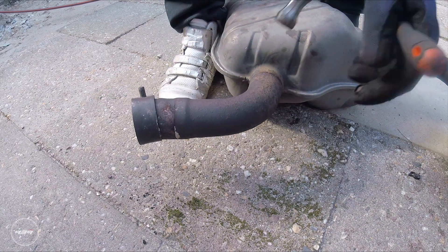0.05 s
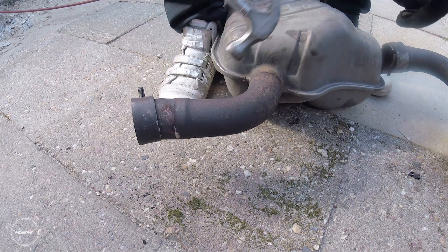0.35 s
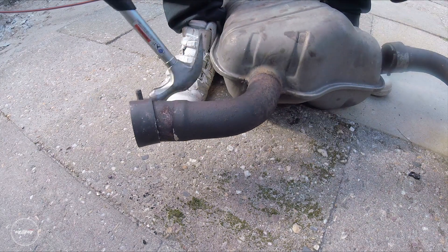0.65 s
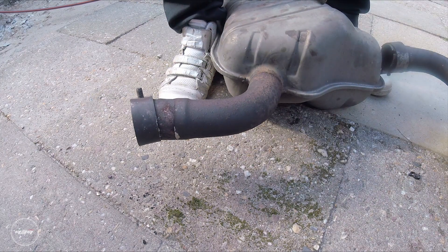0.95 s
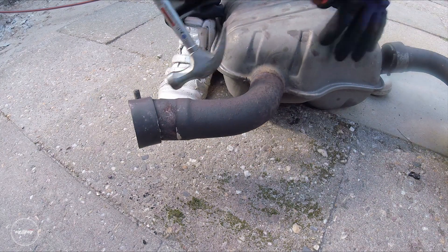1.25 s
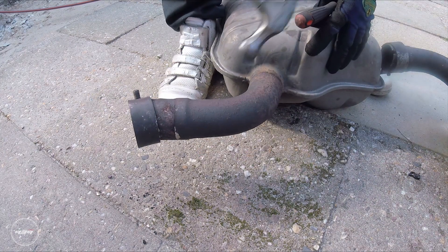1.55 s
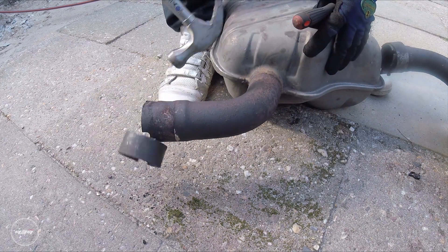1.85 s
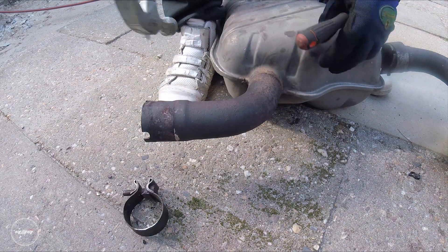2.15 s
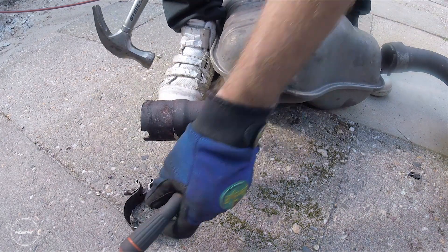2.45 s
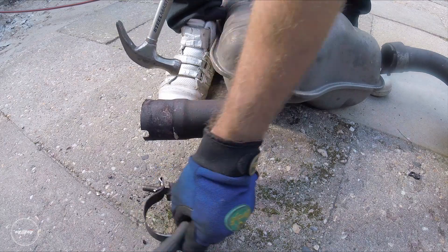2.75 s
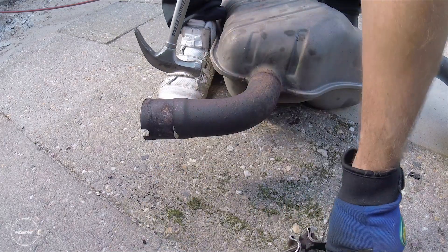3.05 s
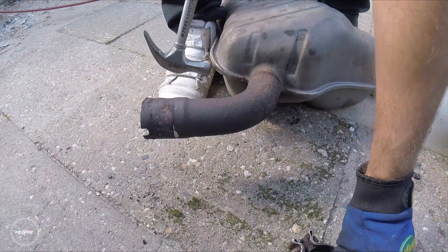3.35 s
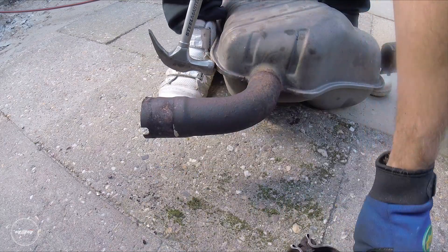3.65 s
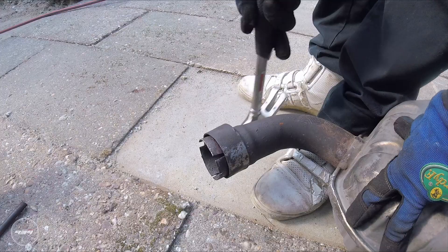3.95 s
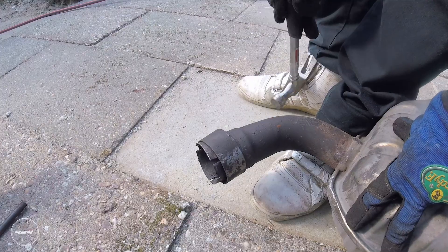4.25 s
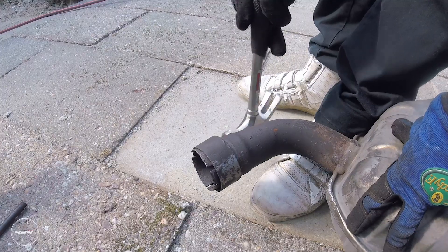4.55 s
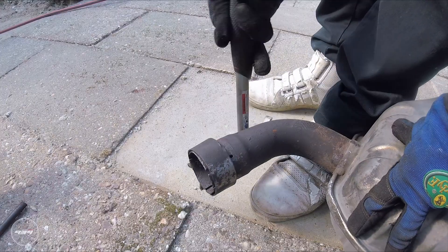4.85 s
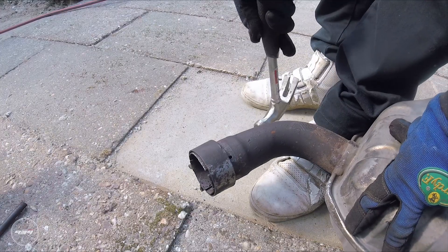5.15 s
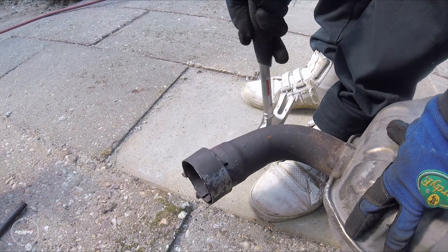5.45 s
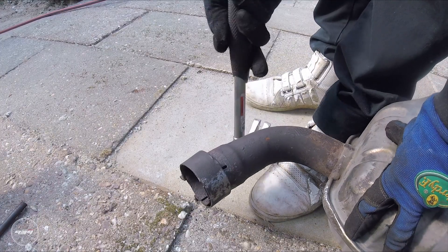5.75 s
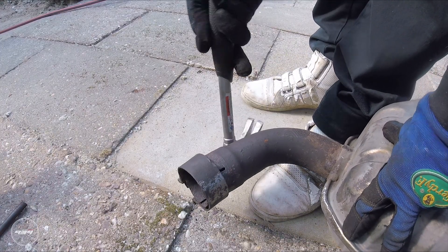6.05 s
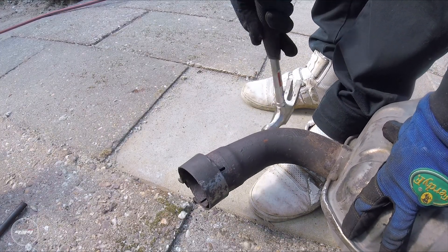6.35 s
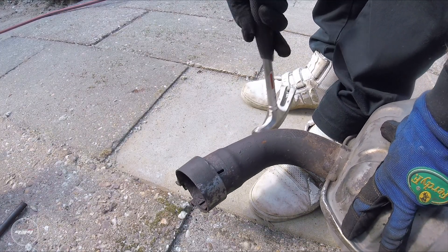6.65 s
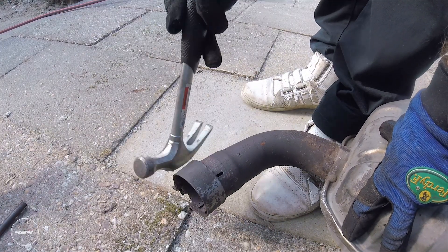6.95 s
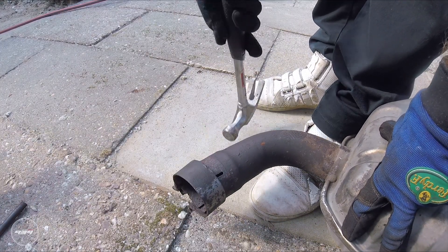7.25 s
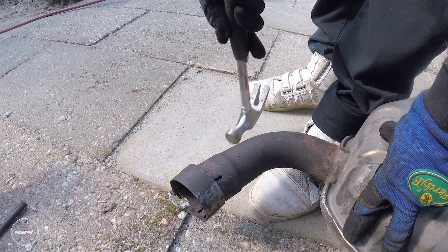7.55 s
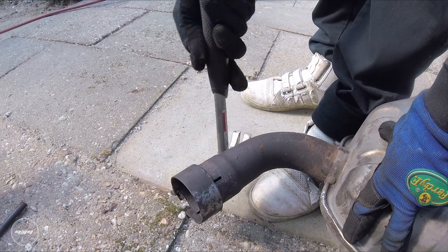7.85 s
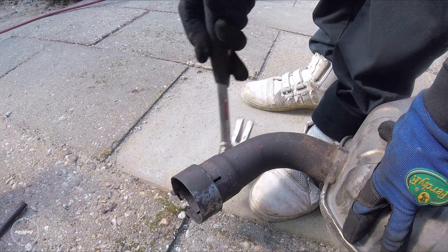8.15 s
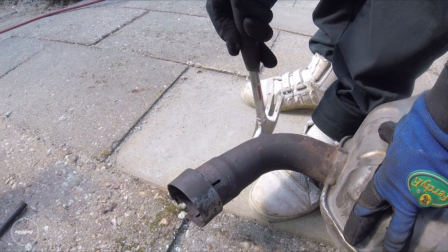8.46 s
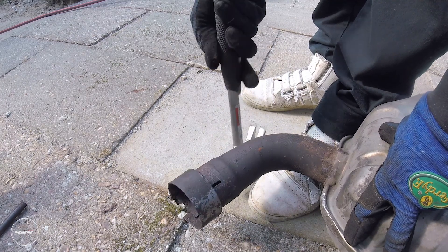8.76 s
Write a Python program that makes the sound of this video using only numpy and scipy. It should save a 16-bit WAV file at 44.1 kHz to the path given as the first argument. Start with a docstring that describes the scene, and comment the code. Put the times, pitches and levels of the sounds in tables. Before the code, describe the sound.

Outdoors on paving, heard close up over quiet air, a hammer strikes a rusty exhaust silencer four times, at about 0.1, 0.6, 1.1 and 1.6 seconds. Each blow is a thin metal clang with a hollow knock, a slight rattle and a lingering pipe tone. At 1.8 seconds a steel collar grinds briefly off the pipe, lands at 1.9 and jingles to rest by 2.2. Soft, damped clinks come around 2.6 and 3.1 as it is picked up, then a tiny drag and the dull clink of a chisel laid down at 3.6. From 4 to 8.6 seconds twelve more blows fall steadily, about 0.4 seconds apart, mostly brighter, with ringing pipe tones, occasional rebounds and low thumps as the silencer rocks. Faint gritty scrapes and crunches slip between them. A distant engine hums faintly behind this run until the end, near 9 seconds.

```python
"""Outdoors on paving, one microphone close to an exhaust silencer. Four claw hammer blows knock a
rusty collar off its pipe; the collar drops, bounces and is picked up, and a chisel is laid down.
Twelve more blows land on a second pipe end, the silencer held up on a shoe, rocking and scraping
on the grit. Each blow makes the thin shell clang, the hollow body knock and the pipe sing on.
An engine hums far off behind the second run of blows."""
import sys
import numpy as np
from scipy import signal
from scipy.fft import rfft, irfft, next_fast_len
from scipy.io import wavfile
from scipy.ndimage import map_coordinates

SR = 44100
rng = np.random.default_rng(int(sys.argv[2]) if len(sys.argv) > 2 else 0)


def dump(signal):
    """Clip the signal to [-1, 1] and save it as 16-bit WAV at the path in sys.argv[1]."""
    limited = np.clip(np.atleast_2d(signal).T, -1, 1)
    pcm = np.round(limited * 32767).astype(np.int16)
    wavfile.write(sys.argv[1], SR, pcm)


N = 392490
T = np.arange(N) / SR
TOP_HZ = 15600  # upper edge of the clang and of the recorder's band
SLIDE_S, SLIDE_PEAK_S, FALL_S = 1.68, 1.826, 1.895  # the collar starts to slide, grinds hardest, lands
LIFT_S = 3.85  # from here on the silencer is held up on a shoe

# hammer blows: t/s, level/dB, brightness/dB, hollow knock/dB, its favoured note f/Hz,
# spot struck (0 at the silencer, 1 at the rim), after-ring/dB, rocking thump/dB
BLOWS = [(.11, -14.5, -1, 0, 596, .1, -1, -17), (.617, -15, -1.5, -0.5, 536, 0.26, -2, -11.5),
         (1.106, -15, 7, -2.5, 448, 0.45, -5.5, -12), (1.5979, -14.5, -0.5, -4.5, 520, 0.93, 3.5, -28),
         (3.963, -14.5, 4, -5.5, 547, 0.3, 3.5, -8), (4.3914, -13.5, 7.5, -8.5, 570, 0.34, 1.5, -3.5),
         (4.8287, -14.5, 3.5, -6, 670, .36, -5.5, -4), (5.245, -16, 6, -2, 491, 0.39, 4.5, -5.5),
         (5.6452, -14.5, 4, -8.5, 1230, 0.42, 0.5, -3), (6.0411, -13, 6, -8.5, 566, 0.63, 1.5, -5.5),
         (6.4376, -10.5, 4.5, -9.5, 1230, .6, -11.5, -9.5), (6.8656, -16.5, 1, -4.5, 553, 0.95, -2.5, -7),
         (7.3355, -12.5, 1, -5, 680, 1, 1, -4.5), (7.7596, -16, 2.5, 0.5, 510, .1, 2.5, -5),
         (8.1718, -16, 9.5, -3, 496, 0.28, 2, -2.5), (8.579, -15.5, -3, -6.5, 900, 0.69, 1, -1)]
# hammer rebounds and light knocks as the silencer shifts: t/s, level/dB, boom/dB, brightness/dB
KNOCKS = [(.134, -20.5, 6.5, -0.5), (.148, -24, 6, 1.5), (.646, -22.5, 9.5, 5), (1.6271, -20, -4, 7.5),
          (1.813, -35.5, -1, 1), (4.056, -40, 9.5, -13), (5.2995, -28.5, 0.5, -13), (6.085, -23, 3, -19),
          (6.525, -35.5, 3, 5), (6.894, -28.5, -6.5, 9), (7.735, -31.5, -6, 8.5), (8.2151, -26.5, 7, 0),
          (8.641, -39, 7, 4)]
# spectrum of the clang with the silencer lying flat: f/Hz, level/dB
LYING = [(70, -16), (190, -13.5), (255, -7.5), (330, -8.5), (540, -6), (1000, -13), (2200, -18),
         (5000, -19.5), (9000, -27), (15000, -33)]
# modes of the collar: f/Hz, level/dB, t60/s
COLLAR = [(683, 1, 0.22), (1487, 3, 0.11), (1823, 8, 0.24), (2236, 2, 0.26), (3237, 11.5, 0.067),
          (4595, 10, 0.055), (5470, 3.5, 0.32), (5930, 2.5, 0.12), (6772, -1, 0.19), (8070, -4, 0.19)]


def shell_clangs(hits, burst, rise_s, burst_s=.011, count=520):
    """Each contact shakes hundreds of crowded shell modes, in a new balance every time."""
    # ring time of the shell: f/Hz, t60/s
    ring_times = [(300, 0.33), (1500, 0.24), (4000, 0.17), (8000, 0.11), (15000, 0.064)]
    t, out = T[:SR // 4], np.zeros(N)
    rank = (np.arange(count) + rng.random(count)) / count
    hz = 70 + (TOP_HZ - 70) * (rank + 7 * rank ** 2) / 8
    weight = np.sqrt(1 + 14 * rank)  # makes up for the sparser modes in the treble
    t60 = along(ring_times, hz) * np.exp(.11 * rng.standard_normal(count))
    phase = np.outer(2 * np.pi * hz, t).astype(np.float32)
    modes = np.sin(phase) * fade(t.astype(np.float32), t60[:, None].astype(np.float32))
    # the thin sheet sheds most of its energy in the first moments
    envelope = (1 + burst * np.exp(-t / burst_s)) * rise(t, rise_s)
    usual = rng.choice([-1, 1], count)
    for s, db, boom_db, bright_db in hits:
        balance = .5 * usual + rng.standard_normal(count)
        strength = balance * weight * shell_gain(hz, s, boom_db, bright_db)
        add(out, s, amp(db) * unit_attack(envelope * (strength.astype(modes.dtype) @ modes)))
    return out


def shell_gain(hz, s, boom_db, bright_db):
    """Colour of the shell at time s: its support, its resonances and the hardness of the contact."""
    # spectrum of the clang with the silencer up on a shoe: f/Hz, level/dB
    held = [(70, -7), (150, -8.5), (240, -15.5), (480, -7), (750, -9), (1300, -7.5), (2200, -14),
            (5000, -17), (8500, -22), (15000, -31)]
    # damped treble resonances of the shell: f/Hz, width/Hz, boost/dB
    peaks = [(2720, 360, 3), (5540, 110, 4), (8450, 1300, 5.5)]
    support = LYING if s < LIFT_S else held
    contact_db = along([(550, boom_db), (1000, 0), (2500, 0), (6500, bright_db)], hz)
    return amp(along(support, hz) + resonances_db(peaks, hz) + contact_db)


def blow_contacts(boom_db=-1):
    """The blows as contacts on the shell: t/s, level/dB, boom/dB, brightness/dB."""
    return [(s, db, boom_db, bright_db) for s, db, bright_db, *_ in BLOWS]


def body_ring(scatter_db=2, light_db=-8, note_db=8.5, note_octaves=.18):
    """Each contact sounds the hollow body's few strong modes; a blow favours those near one note."""
    # hollow modes of the silencer: f/Hz, level/dB, t60/s
    body = [(259.6, -5, 0.08), (440, -4, 0.052), (493.6, 0, 0.056), (555.2, 1, 0.12), (689, -2, 0.092),
            (897, -2, 0.07), (1218, -5, 0.1), (1531, -4.5, 0.12), (1764, -7, 0.056)]
    t, out = T[:SR // 2], np.zeros(N)
    hz, mode_db, t60 = np.transpose(body)
    hits = [(s, db + knock_db, note_db * np.exp(-(np.log2(hz / note) / note_octaves) ** 2))
            for s, db, _, knock_db, note, *_ in BLOWS]
    hits += [(s, db + light_db + boom_db / 2, 0) for s, db, boom_db, _ in KNOCKS]
    for s, db, favour_db in hits:
        level, detune, sign = rng.standard_normal((3, len(hz)))
        strength = np.sign(sign) * amp(mode_db + scatter_db * level + favour_db)
        modes = np.sin(2 * np.pi * np.outer(hz * (1 + .005 * detune), t)) * fade(t, t60[:, None])
        add(out, s, amp(db) * unit_attack(strength @ modes * rise(t, .003)))
    return out


def rattle(relative_db=-16.5, t60=.22):
    """Loose rust and baffles chatter inside the silencer after each blow."""
    t, out = T[:SR // 3], np.zeros(N)
    for s, db, boom_db, bright_db in blow_contacts():
        chatter = slipping(lambda hz: shell_gain(hz, s, boom_db, bright_db - 1), 130, slip_s=.0056)
        add(out, s, amp(db + relative_db) * chatter * fade(t, t60) * rise(t, .012))
    return out


def pipe_ring(spot_width=.22, off_spot_db=-18.5):
    """The stiff pipe sings on after each blow; the spot struck picks the modes, and close ones beat."""
    # modes of the collared pipe and of the second pipe end: f/Hz, t60/s, level/dB, best spot to strike
    collared_pipe = [(286, .65, -35, 0.11), (416, 1.6, -48, .15), (813, 0.95, -39, .15),
                     (1010, 1.6, -52, 0.18), (1115, 3.5, -52.5, .4), (1730, 0.41, -39.5, .1)]
    second_pipe = [(285, 0.63, -31.5, 0.88), (421.5, 1.03, -34.5, .1), (638, .45, -27.5, 0.87),
                   (836, .55, -34, 0.97), (1106, 1.5, -44, 0.89), (1137, 1.06, -32, 0.51),
                   (1167, 0.55, -33.5, .47), (2350, 0.54, -34.5, 0.92), (3800, .28, -35.5, .93),
                   (4865, .4, -48.5, 0.34)]
    t, out = T[:3 * SR // 2], np.zeros(N)
    next_blow = [row[0] for row in BLOWS[1:]] + [np.inf]
    for (s, db, *_, spot, ring_db, _), end in zip(BLOWS, next_blow):
        pipe, end = (collared_pipe, min(end, SLIDE_PEAK_S)) if s < FALL_S else (second_pipe, end)
        hz, t60, mode_db, best_spot = np.transpose(pipe)
        modes = np.sin(2 * np.pi * hz[:, None] * t) * fade(t, t60[:, None]) * rise(t, .0087)
        nearness = np.exp(-((spot - best_spot) / spot_width) ** 2)
        spot_db = off_spot_db * np.sqrt(hz / 1000) * (1 - nearness)
        strength = amp(mode_db + ring_db + spot_db + rng.standard_normal(len(hz)))
        choke = fade(np.maximum(s + t - end, 0), .1)  # the next contact stops the old ring
        add(out, s, choke * (strength @ modes))
    return out


def rocking(hz=48, t60=.43, shove_db=-2):
    """Each blow shoves the whole silencer, which rocks on its support with a low thump."""
    t, out = T[:SR * 2 // 3], np.zeros(N)
    for s, db, *_, thump_db in BLOWS:
        sway_hz = hz * (1 + .018 * rng.standard_normal())
        sway = np.sin(2 * np.pi * sway_hz * t) * fade(t, t60) * rise(t, .029)
        shove = noise([(10, -4), (28, 2), (80, 2.5), (130, -15.5), (300, -51.5)], len(t))
        shove *= amp(shove_db) * fade(t, .27) * rise(t, .019)
        add(out, s, amp(db + thump_db) * (sway + shove))
    return out


def struck_steel(modes, treble_db, crack_db, crack_t60, free=1, crowd_db=-6, crowd_t60=.1, count=36):
    """A small steel piece rings: main modes, a crowd of weak ones, a crack; free < 1 damps the ring."""
    t = T[:SR // 4]

    def tilt(hz):
        return amp(along([(700, .17), (1500, treble_db / 2), (4500, treble_db)], hz))

    def ringing(hz, db, t60):
        cycles = hz[:, None] * t + rng.random((len(hz), 1))
        partials = np.sin(2 * np.pi * cycles) * fade(t, t60 * free)
        return unit_attack((amp(db) * tilt(hz)) @ partials)

    hz, db, t60 = np.transpose(modes)
    detuned_hz = hz * (1 + .002 * rng.standard_normal(len(hz)))
    main = ringing(detuned_hz, db + rng.normal(0, 3.5, len(hz)), t60[:, None])
    crowd_hz = 500 * 29 ** rng.random(count) ** .7
    crowd = ringing(crowd_hz, rng.normal(0, 4, count), crowd_t60)
    grit_colour = [(100, 12.5), (1000, 9.2), (15000, 1.4)]  # f/Hz, level/dB
    grit = filtered(rng.standard_normal(len(t)), lambda f: tilt(f) * amp(along(grit_colour, f)))
    crack = unit_attack(grit * fade(t, crack_t60))
    return unit_attack((main + amp(crowd_db) * crowd + amp(crack_db) * crack) * rise(t, .00032))


def falling_collar(thud_hz=62, thud_db=-44):
    """The collar thuds on the paving and jingles to rest."""
    # its landing and bounces from edge to edge: t/s, level/dB, treble/dB
    bounces = [(1.895, -24.5, 10), (1.906, -33.5, 5), (1.916, -35.5, 3), (1.938, -39, -20),
               (2.007, -36.5, -10.5), (2.07, -38, -13), (2.092, -39.5, -3), (2.164, -49.5, -18)]
    t, out = T[:SR // 2], np.zeros(N)
    add(out, FALL_S, amp(thud_db) * np.sin(2 * np.pi * thud_hz * t) * fade(t, .55))
    for s, db, treble_db in bounces:
        add(out, s, amp(db) * struck_steel(COLLAR, treble_db, crack_db=-3, crack_t60=.073))
    return out


def collar_pickup(drag_s=3.42, drag_length_s=.14, drag_db=-49, width_hz=100, peak_db=21):
    """The collar, damped by a glove, clinks as it is picked up and is dragged briefly."""
    # light touches on the collar: t/s, level/dB, treble/dB
    touches = [(2.562, -43.5, -17), (3.09, -39.5, -21), (3.142, -47, -33.5)]
    out = np.zeros(N)
    for s, db, treble_db in touches:
        add(out, s, amp(db) * struck_steel(COLLAR, treble_db, crack_db=-4.5, crack_t60=.18, free=.38))
    peaks = [(hz, width_hz, peak_db) for hz, *_ in COLLAR]
    colour = [(700, 14), (2300, .5), (3500, -7), (9000, -11.5)]  # f/Hz, level/dB
    drag = slipping(lambda hz: amp(resonances_db(peaks, hz) + along(colour, hz)), 600)
    drag = drag[:round(drag_length_s * SR)]
    add(out, drag_s, amp(drag_db) * unit(drag) * np.hanning(len(drag)))
    return out


def chisel(s=3.59, db=-32):
    """The chisel gives one dull clink as it is laid on the paving."""
    # modes of the chisel: f/Hz, level/dB, undamped t60/s
    modes = [(516, 6, 0.056), (750, 8, 0.12), (817, -8, 0.5), (1036, 8, 0.28), (1290, 2, 0.25)]
    out = np.zeros(N)
    clink = struck_steel(modes, treble_db=-17, crack_db=-21.5, crack_t60=.69, free=.96, crowd_db=-18)
    add(out, s, amp(db) * clink)
    return out


def sliding_collar(peak_db=-32.5, dull_above_hz=6000, rise_db_per_s=110, fall_db_per_s=139):
    """The collar grinds off the pipe, rust on rust, swelling and dying away."""
    # resonances of the sliding collar: f/Hz, width/Hz, boost/dB
    peaks = [(408, 85, 14.5), (605, 130, 14.5), (1637, 31, 24.5), (2580, 80, 16), (4460, 76, 20)]

    def gain(hz):
        return amp(along(LYING, hz) + resonances_db(peaks, hz)) / np.hypot(1, hz / dull_above_hz)

    out = np.zeros(N)
    grind = slipping(gain, 650, rough_db=-1)
    past_peak_s = SLIDE_S + T[:len(grind)] - SLIDE_PEAK_S
    swell_db = np.minimum(rise_db_per_s * past_peak_s, -fall_db_per_s * past_peak_s)
    add(out, SLIDE_S, grind * amp(peak_db + swell_db))
    return out


def scraping(taper=.74):
    """The rusty silencer drags over the grit between blows."""
    # scrapes: start t/s, end t/s, level/dB
    scrapes = [(4.57, 4.698, -44), (6.359, 6.399, -43.5), (6.602, 6.645, -49.5), (7.644, 7.705, -37.5)]
    out = np.zeros(N)
    for start, end, db in scrapes:
        rub = slipping(lambda hz: shell_gain(hz, start, boom_db=3, bright_db=0), 1800)
        rub = rub[:round((end - start) * SR)]
        rub *= amp(wobble(70)[:len(rub)])  # the grit catches and gives way
        rub = unit(rub) * np.hanning(len(rub)) ** taper
        tail = rng.standard_normal(SR // 8) * fade(T[:SR // 8], .23)  # the shell rings on after a slip
        add(out, start, amp(db) * signal.fftconvolve(rub, tail / np.linalg.norm(tail)))
    return out


def crunching(t60=.19):
    """A grain gives way with a sharp tick and crumbles in a few smaller ones."""
    # rust and grit crushed as things shift: t/s, level/dB
    crunches = [(2.325, -63), (4.257, -65), (5.886, -53.5), (6.185, -54), (5.799, -53), (5.953, -57.5),
                (6.334, -57), (7.578, -49.5)]
    t, out = T[:SR // 3], np.zeros(N)
    for s, db in crunches:
        crumbs = slipping(lambda hz: shell_gain(hz, s, boom_db=-10, bright_db=2), 700, slip_s=.003)
        add(out, s, amp(db) * unit_attack(crumbs * fade(t, t60)))
    return out


def distant_engine(rumble_db=-6):
    """Far off, an engine hums at its firing rate over a low rumble; its speed sags and recovers."""
    # course of the engine: t/s, firing rate f/Hz, level/dB
    course = [(6.2, 124.3, -53), (7.3, 112.8, -55.5), (8.2, 120.7, -52.5), (8.9, 123.1, -48)]
    # harmonics of the hum: multiple of the firing rate, level/dB
    harmonics = [(1, 2), (2, -5)]
    times, *columns = np.transpose(course)
    hz, engine_db = (np.interp(T, times, column) for column in columns)
    cycles = np.cumsum(hz * (1 + .03 * wobble(5.9))) / SR
    hum = sum(amp(db + 1.5 * wobble(6)) * np.sin(2 * np.pi * order * cycles) for order, db in harmonics)
    rumble = noise([(40, -4), (300, -10), (1500, -32), (9000, -48)], N)
    fade_in = np.clip((T - LIFT_S) / .1, 0, 1)
    return fade_in * amp(engine_db) * (unit(hum) + amp(rumble_db) * rumble)


def open_air(db=-65):
    """Quiet open air all round the microphone, its level drifting slowly."""
    # spectrum of the air: f/Hz, level/dB
    spectrum = [(50, 0), (160, -3), (280, -11), (900, -17), (2000, -26), (15000, -38)]
    return noise(spectrum, N) * amp(db + wobble(1))


def slipping(gain, slips_per_s, rough_db=5.5, slip_s=.002):
    """A third of a second of tiny, uneven slips of rust on rust, heard through a body's gain."""
    n = SR // 3
    chance, size, hiss = rng.random(n), rng.standard_normal(n), rng.standard_normal(n)
    slips = (chance < slips_per_s / SR) * amp(rough_db * np.minimum(size, 2))
    grains = signal.lfilter([1], [1, -np.exp(-1 / (slip_s * SR))], slips)
    return unit(filtered(grains * hiss, lambda hz: gain(hz) * hz / (hz + 250)))


def amp(db):
    """Decibels to gain."""
    return 10 ** (np.asarray(db) / 20)


def unit(x):
    """Scale to rms 1."""
    return x / np.sqrt(np.mean(x ** 2) + 1e-20)


def unit_attack(x):
    """Scale so that the first 24 ms have rms 1."""
    return x / np.sqrt(np.mean(x[:round(.024 * SR)] ** 2) + 1e-20)


def along(points, hz):
    """Interpolate (f/Hz, value) points on a log frequency axis."""
    f, values = np.transpose(points)
    return np.interp(np.log(hz + 1), np.log(f + 1), values)


def resonances_db(peaks, hz):
    """Bell-shaped resonances on a flat response."""
    return sum(db / (1 + (2 * (hz - centre) / width) ** 2) for centre, width, db in peaks)


def wobble(rate):
    """A smooth random curve, rate knots a second."""
    return map_coordinates(rng.standard_normal(int(N * rate / SR) + 4), [T * rate])


def rise(t, rise_s):
    """Exponential onset from 0 towards 1."""
    return 1 - np.exp(-t / rise_s)


def fade(t, t60):
    """Exponential decay, 60 dB down at t60."""
    return np.exp(-float(np.log(1000)) * t / t60)


def filtered(x, gain):
    """x times a gain that depends on frequency."""
    m = next_fast_len(len(x) + 8192)
    return irfft(rfft(x, m) * gain(np.fft.rfftfreq(m, 1 / SR)), m)[:len(x)]


def noise(spectrum, n):
    """n samples of noise at rms 1, shaped by (f/Hz, level/dB) points."""
    return unit(filtered(rng.standard_normal(n), lambda hz: amp(along(spectrum, hz))))


def add(track, s, sound):
    """Mix a sound into the track at time s."""
    part = track[max(round(s * SR), 0):][:len(sound)]
    part += sound[:len(part)]


def scene():
    """One microphone: the work close up, the engine and the open air behind."""
    blows = shell_clangs(blow_contacts(), burst=3.2, rise_s=.0016)
    rebounds = shell_clangs(KNOCKS, burst=8, rise_s=.0008)
    silencer = blows + rebounds + body_ring() + rattle() + pipe_ring() + rocking()
    loose_steel = falling_collar() + collar_pickup() + chisel()
    friction = sliding_collar() + scraping() + crunching()
    return (silencer + loose_steel + friction + distant_engine() + open_air())[None]


def record(dry, ceiling=.68, hardness=4):
    """The recorder rounds off the loudest peaks and cuts steeply above its band limit."""
    squashed = dry[0] / (1 + np.abs(dry[0] / ceiling) ** hardness) ** (1 / hardness)
    return filtered(squashed, lambda hz: 1 / np.hypot(1, (hz / TOP_HZ) ** 50))[None]


dry = scene()
out = record(dry)
dump(out)
```